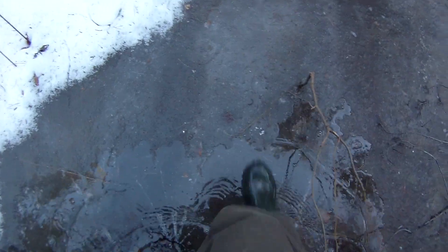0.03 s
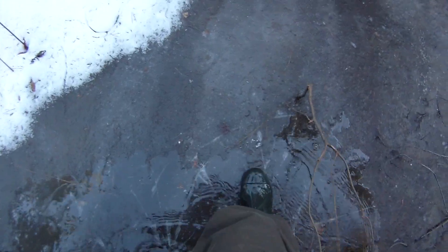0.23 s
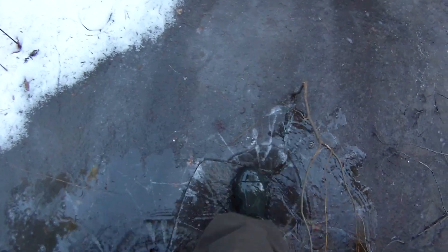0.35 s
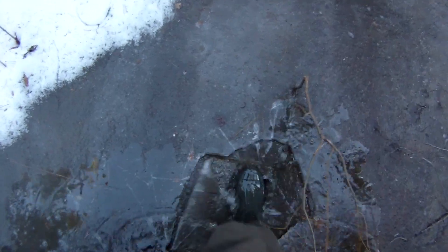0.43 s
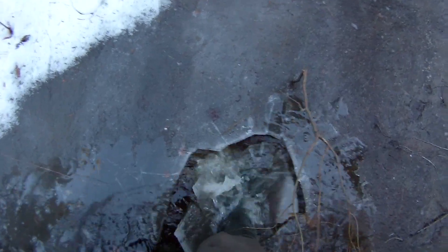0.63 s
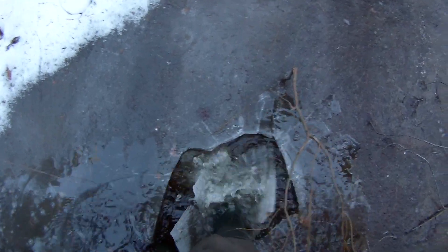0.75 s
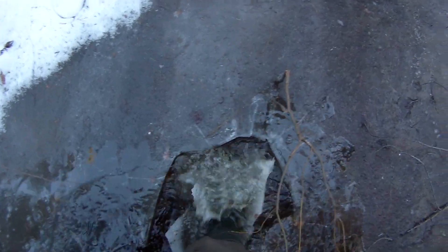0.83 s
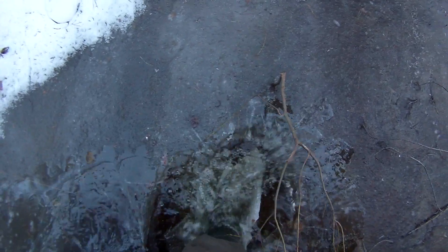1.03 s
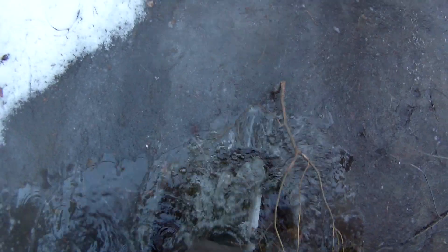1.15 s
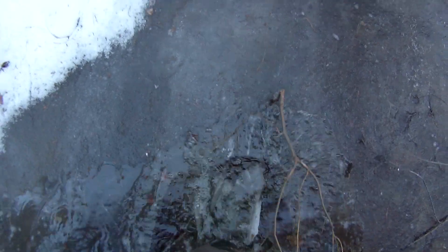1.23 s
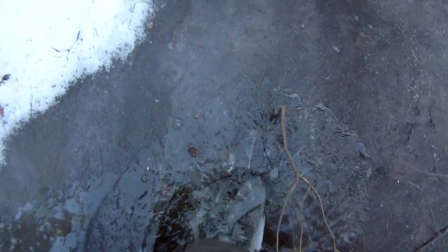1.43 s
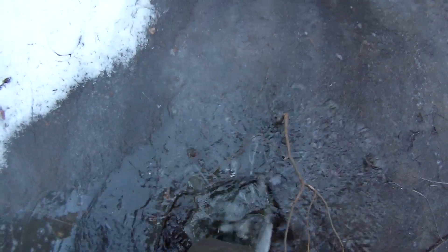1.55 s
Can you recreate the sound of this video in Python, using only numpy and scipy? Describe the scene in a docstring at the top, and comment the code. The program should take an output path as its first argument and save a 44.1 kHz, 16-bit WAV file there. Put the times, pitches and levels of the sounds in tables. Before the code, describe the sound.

Thin ice cracks and crunches under a boot, then water sloshes over it.

```python
"""A faint outdoor rumble and a stir of water, then thin ice snaps under a boot, close below the mic.
The sheet on the puddle cracks, crunches and gives way; the plate tips under, air gulps out in
bubbles of rising pitch, water sloshes over it and loose shards clink.
Thin trickles and the rumble remain. Everything sits straight ahead, almost dry."""
import sys
import numpy as np
from scipy import signal
from scipy.io import wavfile
from scipy.ndimage import uniform_filter1d

SR = 44100
rng = np.random.default_rng(int(sys.argv[2]) if len(sys.argv) > 2 else 0)


def store_pcm(level_fs):
    """Save levels as 16-bit WAV."""
    pcm = np.round(np.clip(level_fs, -1, 1) * 32767).astype(np.int16)
    wavfile.write(sys.argv[1], SR, np.atleast_2d(pcm).T)


N = 70560
TIME = np.arange(N) / SR


def amp(db):
    """Decibels to gain."""
    return 10 ** (np.asarray(db) / 20)


def unit(x):
    """Scales to an rms of one."""
    return x / np.sqrt(np.mean(x ** 2) + 1e-20)


def level(points):
    """Gain over time from a curve of t/s, level/dB."""
    return amp(np.interp(TIME, *np.transpose(points)))


def add(mix, s, sound):
    """Mixes a sound in at s seconds."""
    part = mix[max(round(s * SR), 0):][:len(sound)]
    part += sound[:len(part)]


def colour(x, points, size=4096):
    """Minimum-phase filter from a curve of f/Hz, level/dB."""
    hz, db = np.transpose(points)
    bin_hz = abs(np.fft.fftfreq(size, 1 / SR))
    log_gain = np.log(amp(np.interp(np.log(bin_hz + 1), np.log(hz), db)))
    taps = np.fft.ifft(np.exp(np.conj(signal.hilbert(log_gain)))).real[:size // 2]
    return signal.fftconvolve(x, taps)[:len(x)]


def grains(spectrum, per_s, spread_db):
    """A stream of tiny random impacts of uneven strength, held at a steady rms."""
    strength = amp(spread_db * np.minimum(rng.exponential(1, N), 4))
    impacts = strength * rng.choice([-1, 1], N) * (rng.random(N) < per_s / SR)
    x = colour(impacts, spectrum)
    return x / np.sqrt(abs(uniform_filter1d(x ** 2, size=1100)) + 1e-12)


def outdoor_air():
    """Low rumble and faint hiss of the open air around the puddle."""
    # background spectrum: f/Hz, level/dB
    spectrum = [(15, 1), (35, -6), (70, 0.5), (130, -6.5), (250, -13), (600, -20.5), (1500, -39),
                (3200, -34.5), (5000, -33.5), (9000, -43), (16000, -62)]
    return amp(-51.5) * unit(colour(rng.standard_normal(N), spectrum))


def slosh():
    """Water churns over the plate in a mass of tiny splashes."""
    # surges of the water: t/s, level/dB
    surges = [(0, -50), (.14, -65), (.34, -62.5), (.39, -46.5), (.56, -50.5), (.62, -39.5), (.7, -41),
              (.78, -41), (.82, -48), (.87, -46), (.94, -61.5), (1.0, -48), (1.05, -60.5), (1.14, -59.5),
              (1.6, -68.5)]
    # splash spectrum: f/Hz, level/dB
    spectrum = [(40, -25), (110, -2), (250, -2.5), (550, -1), (1000, -10), (2000, -25), (6000, -41.5)]
    return level(surges) * grains(spectrum, per_s=1500, spread_db=3.5)


def droplets(count=2000, low_hz=900, high_hz=14630, db_per_octave=-2.5):
    """Tiny bubbles and chips ring for a few cycles each, gliding in pitch."""
    x, t = np.zeros(N), np.arange(1500) / SR
    for when, height, glide, faintness in rng.random((count, 4)):
        octave = height * np.log2(high_hz / low_hz)
        cycles = low_hz * 2 ** octave * t
        age = cycles / (5.35 * np.sqrt(1 + octave))  # high ones last more cycles
        bend = 1 + 0.081 * (glide - .3) * np.minimum(age, 4)
        ring = age * np.exp(-2 * age) * np.sin(2 * np.pi * cycles * bend)
        db = db_per_octave * octave - 2 * np.log(faintness + 0.023)
        add(x, when * N / SR, amp(db) * ring)
    return unit(x)


def crunch():
    """Countless small fractures and droplets as the boot sinks."""
    # crushing of the ice: t/s, level/dB
    crushing = [(0, -58), (.14, -57.5), (.19, -53), (.225, -47.5), (.26, -58.5), (.345, -52), (.39, -45),
                (.435, -47), (.48, -48.5), (.52, -43), (.56, -47), (.595, -39.5), (.625, -41.5),
                (.66, -36.5), (.71, -35.5), (.745, -41), (.8, -39), (.835, -44.5), (.865, -34.5),
                (.895, -51.5), (.94, -43), (.99, -49.5), (1.04, -53.5), (1.11, -48.5), (1.19, -56),
                (1.33, -55), (1.43, -63), (1.6, -60.5)]
    # fracture spectrum: f/Hz, level/dB
    spectrum = [(100, -18), (400, -13.5), (800, -0.5), (1300, 2.5), (2000, 4), (3000, 3), (4500, -7.5),
                (9000, -11), (16000, -21)]
    fractures = grains(spectrum, per_s=1900, spread_db=3)
    return level(crushing) * (amp(-5) * fractures + amp(-4.5) * droplets())


def bubbles(attack=0.33, decay=1.87, roughness=0.37):
    """Pockets of trapped air ring and climb in pitch as they near the surface."""
    # air pockets: t/s, level/dB, start f/Hz, rise/(octaves per s), length/s
    pockets = [(0.022, -45, 838, 13.6, 0.023), (0.659, -31.5, 386, 3.1, 0.034),
               (0.708, -31.5, 112, 7.4, 0.045), (0.745, -27.5, 190, 27.6, .02), (.762, -25, 328, 4, 0.01),
               (.772, -31.5, 180, 12.6, 0.028), (.774, -42, 420, 25, 0.0032), (0.783, -26.5, 539, 4, .011),
               (.814, -37.5, 748, 27, 0.014), (.909, -35.5, 330, 45, 0.028), (.932, -45, 632, 9.4, 0.031),
               (0.932, -27, 565, 36, 0.011), (0.971, -31.5, 900, 98, 0.0047), (1.021, -36, 292, 5.5, 0.011),
               (1.069, -35, 1290, 11, 0.0088), (1.091, -35, 510, 2, 0.0072), (1.094, -42, 476, 3, 0.033),
               (1.135, -39, 510, 8, 0.0064), (1.139, -49, 559, 20, .055), (1.2245, -36.5, 530, 3, 0.0051)]
    x, t = np.zeros(N), np.arange(8000) / SR
    for s, db, start_hz, rise, length_s in pockets:
        age = t / length_s
        swell = np.sin(np.pi / 2 * np.minimum(age / attack, 1)) * np.exp(-decay * age ** 2)
        wobble = 1 + roughness * unit(uniform_filter1d(rng.standard_normal(len(t)), size=90))
        hz = start_hz * 2 ** (rise * np.minimum(t, 2 * length_s))
        add(x, s, amp(db) * swell * wobble * np.sin(2 * np.pi * np.cumsum(hz) / SR))
    return x


def crack(hz, splinter_s, width_hz=1500, knock_hz=301, knock_s=0.0018, size=2048):
    """A snap and splinters flex the sheet; the deeper the crack, the more the water under it knocks."""
    t = np.arange(size) / SR
    age = t / splinter_s
    noise = rng.standard_normal(size)
    splinters = noise * abs(noise) * (1 - np.exp(-age / 0.32)) * np.exp(-age)
    band = signal.iirpeak(hz, max(hz / width_hz, .5), SR)
    share = amp(6) * splinter_s / .002  # a brief crack is one clean snap
    snap = unit(signal.lfilter(*band, t == 0)) + share * unit(signal.lfilter(*band, splinters))
    snap = signal.lfilter(*signal.butter(1, 2.26 * hz, fs=SR), snap)  # deep cracks open more slowly
    knock = unit(np.sin(2 * np.pi * knock_hz * t) * np.exp(-t / knock_s))
    knock_gain = amp(-14.5) * 1500 / hz
    return (unit(snap) + knock_gain * knock) * np.sqrt(SR / 1000 / size)  # energy referred to 1 ms


def ice_sheet(ring_t60_s=0.025, patches=5):
    """Cracks run through the sheet, which rings briefly after each."""
    # cracks: t/s, level/dB, f/Hz, splintering time/s
    cracks = [(.158, -44, 2860, 0.0034), (0.1844, -37.5, 2160, 0.0031), (0.212, -28, 1180, 0.0012),
              (0.2142, -28.5, 1500, 0.0011), (0.2171, -33.5, 1160, 0.00033), (0.2335, -27.5, 1430, 0.00045),
              (0.234, -32, 2000, 0.0014), (.24, -39, 3000, 0.00085), (0.2872, -38.5, 2470, 0.00078),
              (0.29, -35, 1320, 0.0044), (0.3071, -32, 2230, 0.00046), (0.3294, -37.5, 2400, 0.0028),
              (0.3569, -27, 1990, 0.00078), (.359, -31, 1210, 0.00051), (0.3639, -26, 2570, 0.001),
              (0.367, -29.5, 1460, 0.0019), (0.3823, -34, 2760, 0.00096), (0.4171, -28, 1980, 0.002),
              (0.449, -27, 3100, 0.0038), (0.4677, -34.5, 3350, 0.00071), (0.4962, -34, 1490, 0.0018),
              (0.506, -35, 2180, 0.00062), (0.5793, -25, 2980, 0.0024), (.5854, -29.5, 3500, 0.0019),
              (0.5859, -30.5, 750, .0008), (0.6521, -28.5, 1680, 0.0014), (0.6943, -21.5, 1380, 0.0022),
              (.698, -27, 2380, 0.0026), (0.701, -28, 2450, 0.0022), (0.7098, -23.5, 1280, 0.0034),
              (0.7214, -30, 2140, 0.0015), (0.7251, -30, 1330, 0.0007), (0.815, -27, 2700, 0.0042),
              (0.826, -33, 3570, 0.00062), (0.851, -27, 2690, 0.0012), (0.9221, -35, 3300, 0.0012),
              (1.0035, -37, 1400, 0.0013), (1.1291, -36, 2570, 0.0024), (1.224, -30.5, 1940, 0.00035),
              (1.3687, -44.5, 3080, 0.0043)]
    # tone of the cracks: f/Hz, level/dB
    crack_tone = [(60, -1), (200, 8.5), (550, 2), (1300, 3.5), (2100, -0.5), (5000, -2), (9000, 4.5),
                  (16000, 4)]
    # tone of the ringing plate: f/Hz, level/dB
    plate_tone = [(60, -6.5), (200, -0.5), (500, 5), (1500, -4.5), (4000, -4.5), (16000, -0.5)]
    snaps, ring = np.zeros((2, N))
    for s, db, hz, splinter_s in cracks:
        add(snaps, s, amp(db) * crack(hz, splinter_s))
    snaps = amp(-1) * colour(snaps, crack_tone)
    patch = np.arange(N) // 300 % patches  # patches take turns, each with its own ring
    for k in range(patches):
        tail = rng.standard_normal(N) * amp(-60 * TIME / ring_t60_s)
        ring += signal.fftconvolve(snaps * (patch == k), tail / np.linalg.norm(tail))[:N]
    return snaps + amp(-5.5) * colour(ring, plate_tone)


def shards(attack_s=0.0001):
    """Loose pieces touch with a short, high ring."""
    # clinks: t/s, level/dB
    clinks = [(1.0462, -26), (1.1138, -30.5), (1.1155, -34), (1.3705, -46)]
    # modes of a shard: f/Hz, level/dB, t60/s
    modes = [(4500, -3.5, .008), (4720, -10, 0.0085), (7400, -3, 0.0064)]
    x, t = np.zeros(N), np.arange(2048) / SR
    ring = sum(amp(db - 60 * t / t60) * np.sin(2 * np.pi * hz * t) for hz, db, t60 in modes)
    for s, db in clinks:
        add(x, s, amp(db) * ring * (1 - np.exp(-t / attack_s)))
    return x


def trickles(width_hz=490):
    """Films of water hiss in narrow, gliding bands."""
    # thin chirps of water: t/s, level/dB, start f/Hz, end f/Hz, length/s
    chirps = [(1.494, -61.5, 3740, 2670, 0.045), (1.561, -63.5, 2820, 3700, 0.038)]
    x = np.zeros(N)
    lowpass = signal.butter(2, width_hz / 2, fs=SR, output="sos")
    for s, db, start_hz, end_hz, length_s in chirps:
        age = np.clip((TIME - s) / length_s, 0, 1)
        phase = 2 * np.pi * np.cumsum(start_hz + (end_hz - start_hz) * age) / SR
        a, b = signal.sosfilt(lowpass, rng.standard_normal((2, N)))
        hiss = unit(a * np.cos(phase) + b * np.sin(phase))
        x += amp(db) * np.sin(np.pi * age) * hiss
    return x


def scene():
    """The puddle close up and dead centre, with barely any reflection from the sides."""
    # faint scattered reflections, left against right: f/Hz, level/dB
    scatter = [(1800, -91), (4500, -68), (16000, -18)]
    mid = outdoor_air() + slosh() + crunch() + bubbles() + ice_sheet() + shards() + trickles()
    echoes = rng.standard_normal(200)
    side = colour(signal.fftconvolve(mid, echoes / np.linalg.norm(echoes))[:N], scatter)
    return np.array([mid + side, mid - side])


def record(dry, edge_hz=16000):
    """A stereo microphone with a bright top end, a trace of self-noise and a band limit."""
    # microphone response: f/Hz, level/dB
    response = [(3500, 0.5), (4600, 0.5), (5500, -9.5), (6400, -11.5), (7600, 0), (10000, 5), (12000, -2.5),
                (14000, 8), (16000, 10)]
    # self-noise spectrum of each channel: f/Hz, level/dB
    self_noise = [(25, 35), (100, 12), (400, 7.5), (2000, -16), (4000, 4), (16000, -2)]
    x = np.array([colour(channel, response) + amp(-79) * colour(rng.standard_normal(N), self_noise)
                  for channel in dry])
    band_limit = signal.firwin(401, edge_hz, window=("kaiser", 8), fs=SR)
    return signal.oaconvolve(x, band_limit[None], "same", axes=1)


dry = scene()
out = record(dry)
store_pcm(out)
```